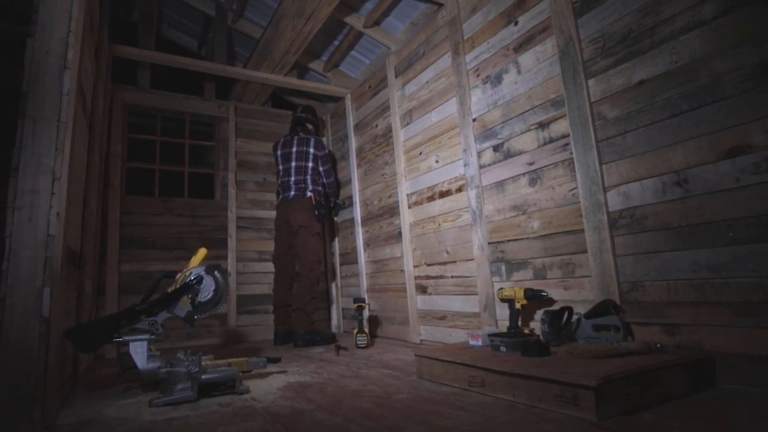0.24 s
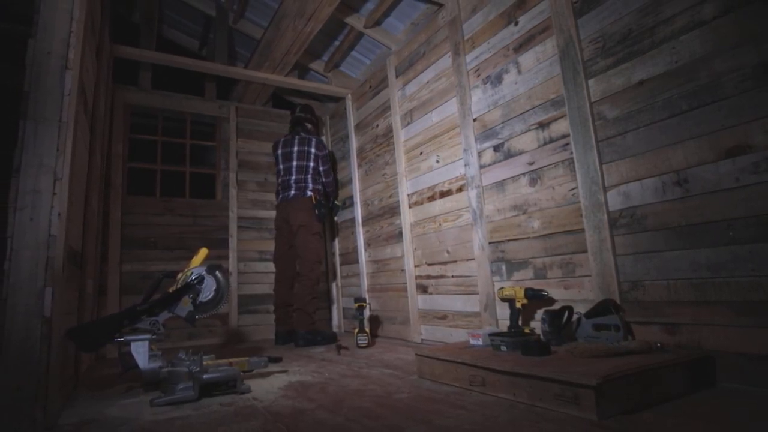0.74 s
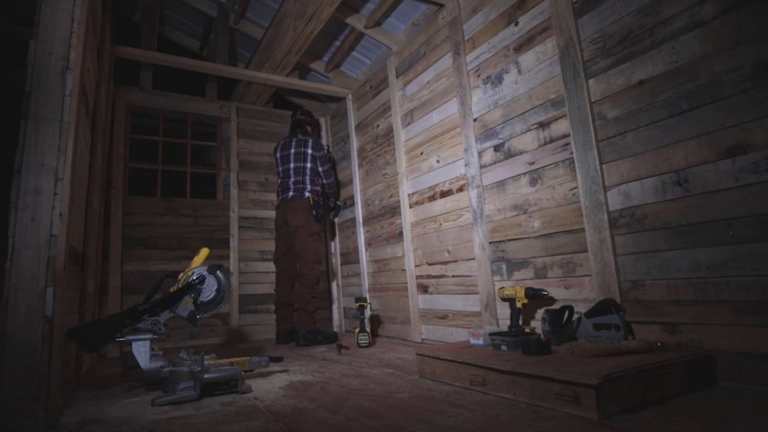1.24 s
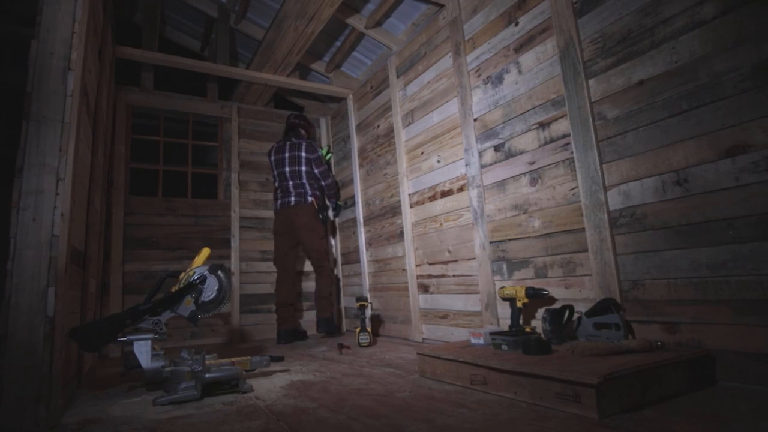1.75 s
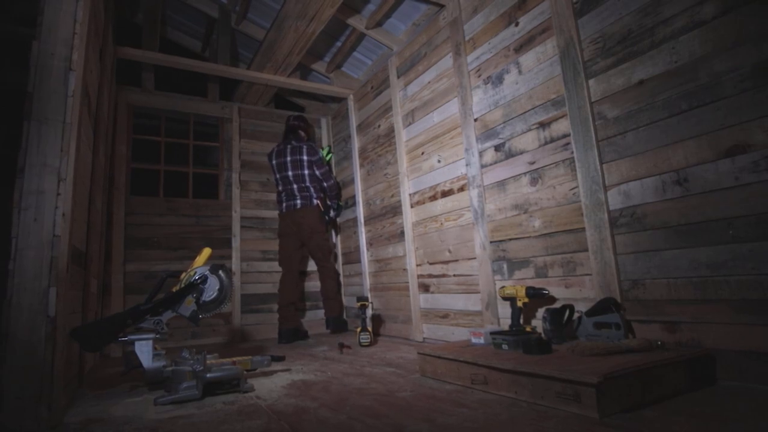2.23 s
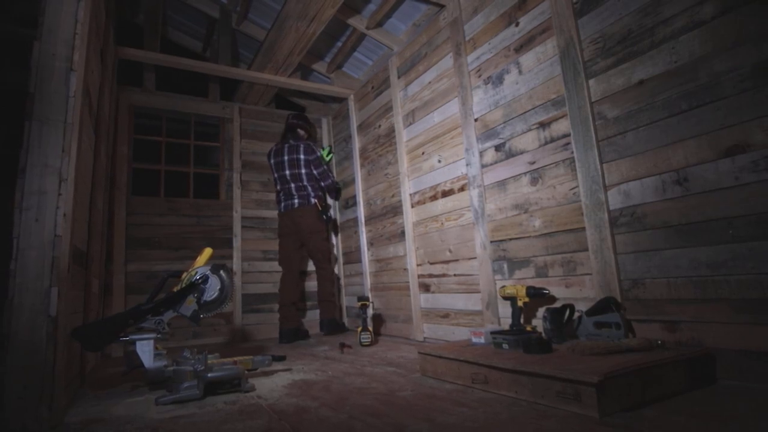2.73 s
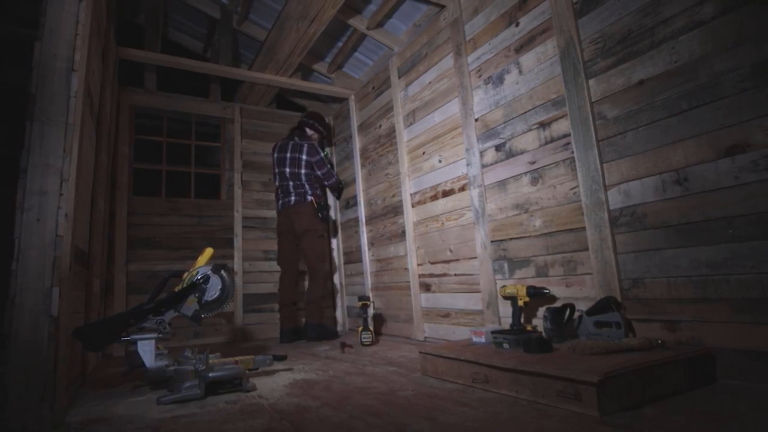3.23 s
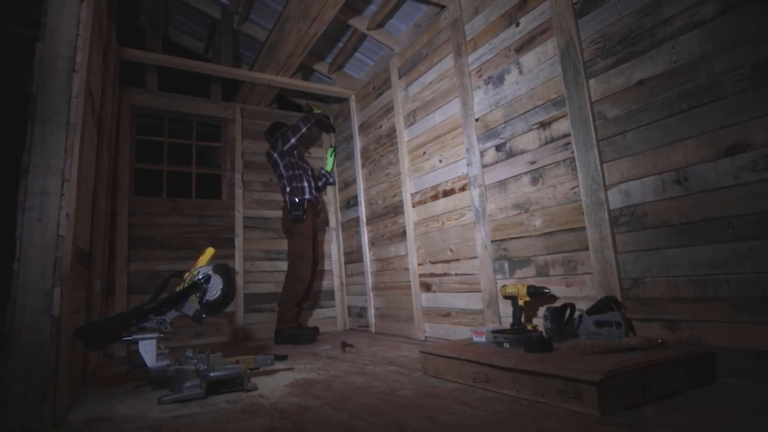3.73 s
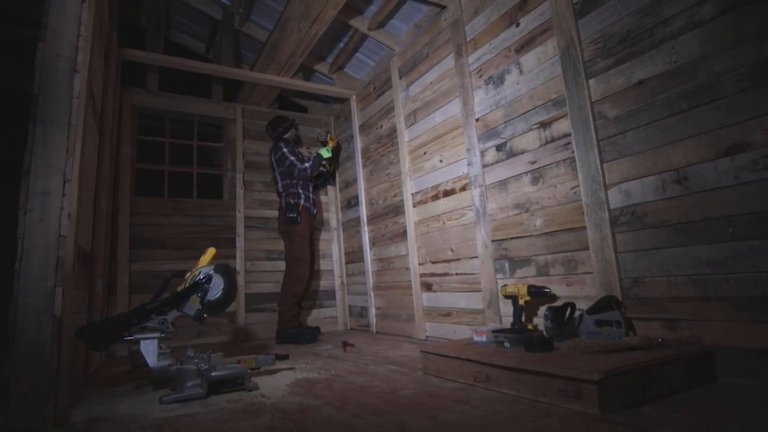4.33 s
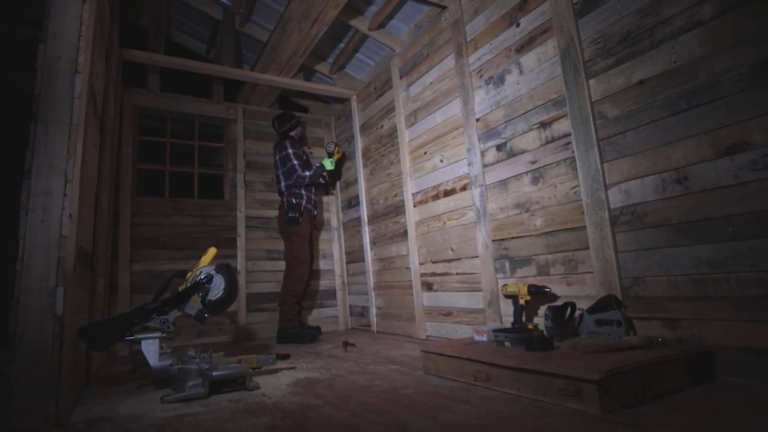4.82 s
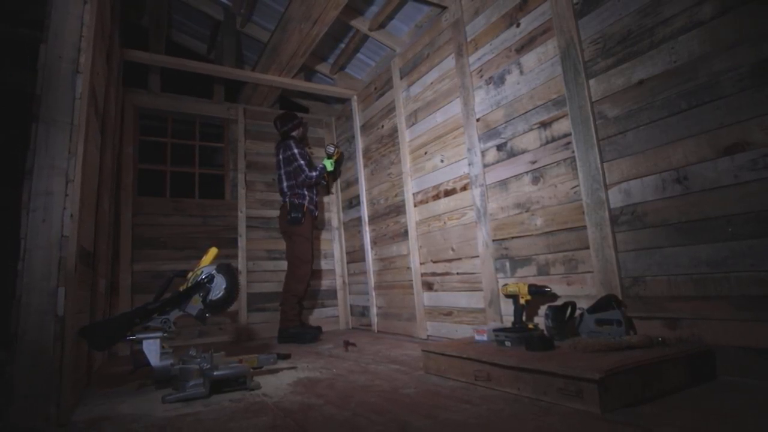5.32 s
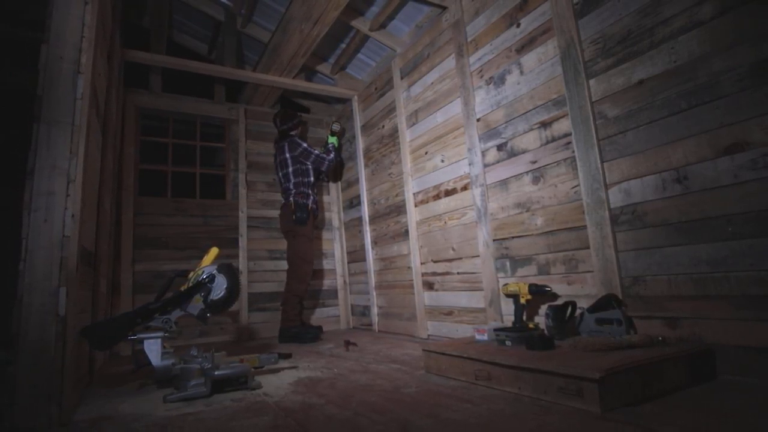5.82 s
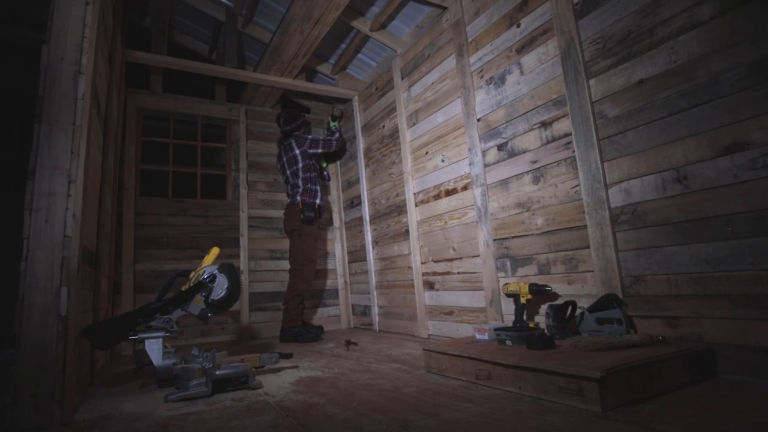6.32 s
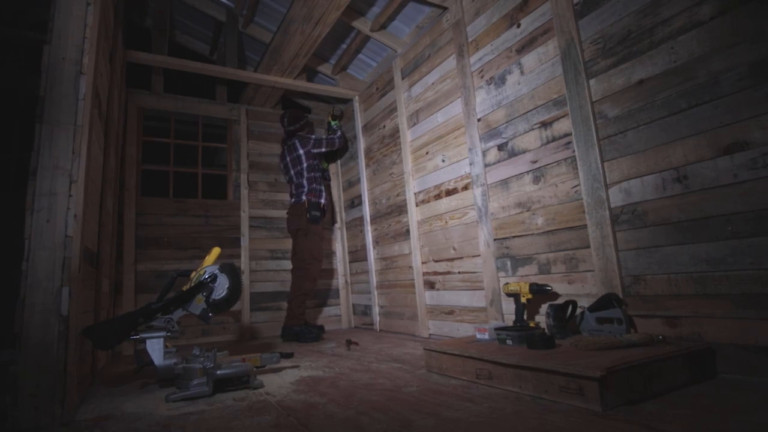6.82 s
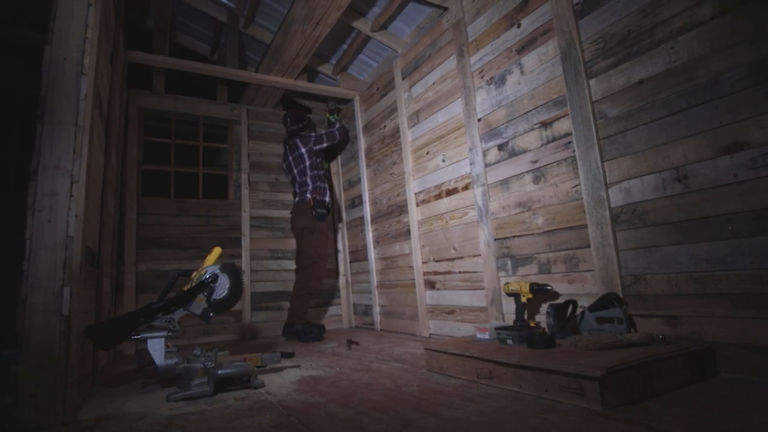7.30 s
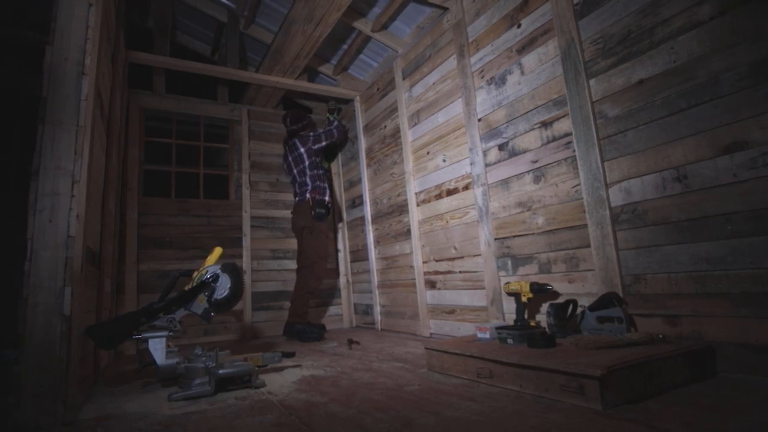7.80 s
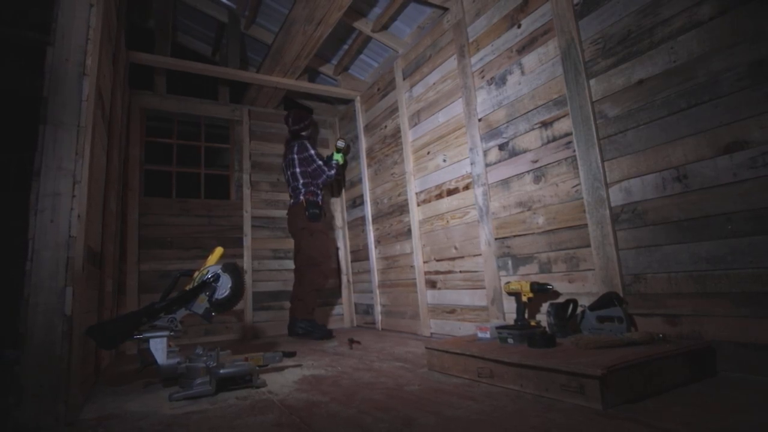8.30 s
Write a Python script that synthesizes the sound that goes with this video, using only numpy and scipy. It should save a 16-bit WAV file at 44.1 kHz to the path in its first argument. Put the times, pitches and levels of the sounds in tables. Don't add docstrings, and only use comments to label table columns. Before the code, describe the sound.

In a small wooden cabin, a board is knocked twice, then a cordless nailer whirs up and slams in two nails with loud cracks.

```python
import sys
import numpy as np
from scipy import signal
from scipy.fft import rfft, irfft, next_fast_len
from scipy.io import wavfile
from scipy.ndimage import uniform_filter1d, map_coordinates

SR = 44100
rng = np.random.default_rng(int(sys.argv[2]) if len(sys.argv) > 2 else 0)


def voltage_ratio(decibels):
    exponent = np.asarray(decibels, float) / 20
    return 10 ** exponent


def generate_wav(signal):
    frames = np.transpose(np.atleast_2d(signal))
    scaled = np.clip(frames, -1, 1) * 32767
    pcm = np.round(scaled).astype(np.int16)
    wavfile.write(sys.argv[1], SR, pcm)


N = 377055

# t/s, pole whine f/Hz
SPEED = [
    [(3.585, 30.02), (3.68, 398.2), (3.862, 1594), (3.915, 1723), (4.25, 1798), (4.4, 1749), (4.57, 1663),
     (4.76, 1500), (5.5, 950), (6.5, 60.08)],
    [(6.99, 29.92), (7.08, 390), (7.28, 1575), (7.325, 1697), (7.38, 1762), (7.81, 1768), (8.08, 1726),
     (8.3, 1659), (8.55, 1598)],
]
# t/s, level/dB, vents facing the ports/dB
RUNNING = [
    [(3.6, -84.5, -8), (3.68, -61, -9), (3.915, -55.5, -5.5), (4.2, -69, -6.5), (4.6, -68, -4),
     (5.35, -76.5, -4), (5.87, -95, 7), (6.44, -101, 12), (6.5, -101, -6)],
    [(7.0, -96.5, 2.5), (7.062, -70.5, -3), (7.15, -59.5, -10), (7.288, -57, -6), (7.442, -59, -9.5),
     (7.81, -59.5, -9.5), (8.13, -66, -11), (8.16, -66, -20.5), (8.55, -67, -25.5)],
]
# whine after stroke/dB, whine swell at the ring/dB, rattle swell/dB, rattle at full torque/dB
RUNS = [(-1, 11, 1, -51), (8, 5, 10.8, -46)]
# multiple of the whine, level/dB, extra at full torque/dB
WHINE_ORDERS = [(1, -11, -1), (2, -43.5, 28.5), (3, -47, 23.5)]
POLES = 12
SHAFT_ORDERS = [1, 2, 3, 4, 7, 8, 9, 11, 12, 17, 19, 20, 21]
SHAFT_DB = [1.5, -9, -12.5, -5.5, -12, -14.5, -14, -6, -10.5, -12.5, -18, -16, -8.5]
# f/Hz, width/Hz, lift/dB
HOUSING = (1670, 65, 25.3)
RATTLE_RINGS = [(1.04, .5), (1, 1), (.95, .4)]
WHINE_DB, TORQUE_DB, LOW_HZ, LOW_DB_PER_OCTAVE = -10, 9, 1080, 36
CROSS_HZ, CROSS_WIDTH_HZ = 1635, 45
LULL_HZ, LULL_WIDTH_HZ, LULL_DB = 1420, 110, 7.5
COAST_HZ, COAST_WIDTH_HZ = 1700, 35
COAST_SWELL_DB = [2, 3]
GLIDE_DB = np.array([12, 10.5])
GLIDE_CLEAR_HZ = 130
GRIP_S, GRIP_DB = 0.021, -22
IDLE_RATTLE_DB, RATTLE_FROM_HZ, HUM_DB = -12.5, 480, -17
# from t/s, to t/s, lift/dB, sag/dB
PRESS = (7.33, 7.91, 18.2, 18)
# from t/s, to t/s, treble level/dB
SHADE = (4.42, 4.545, -39)
FIZZ_DB, FIZZ_DB_PER_OCTAVE = -3.5, 5.5
# f/Hz, width/Hz, level/dB
GEARS1 = [(475, 71, -4.5), (1050, 120, -3.5), (1650, 180, -1.5), (2220, 99, -1), (4660, 56, -15),
          (5828, 130, -9), (6930, 240, -11), (3030, 380, -7), (10204, 160, -18.5), (11085, 220, -17.5),
          (13300, 190, -12.5), (14200, 26, -35.5)]
# f/Hz, width/Hz, level/dB
GEARS2 = [(500, 54, -6), (574, 8.5, -9.5), (1034, 25, 0), (1202, 62, -9), (1654, 17, -3.5), (1760, 30, -4),
          (2460, 48, -5), (3000, 18, -4), (3190, 110, 0), (3100, 18, 4.5), (474, 14, 0.5),
          (6280, 65, -19.5), (7650, 190, -18)]
# f/Hz, level/dB per Hz
CASE1 = [(180, -32), (300, -10.5), (1680, -9.5), (2020, -8.5), (2230, -4), (3610, -12), (5840, -23),
         (15800, -43)]
# f/Hz, level/dB per Hz
CASE2 = [(180, -35.5), (300, -5.5), (582, -13.5), (812, -10), (1020, -11), (1770, -10.5), (1950, -3.5),
         (3160, -3.5), (4330, -18), (11900, -32), (15800, -60)]
# t/s, peak level/dB, bass/dB, treble/dB, left-right/dB
SHOTS = [
    (3.9301, -7, -1, 2, 0),
    (7.827, -5, -7.5, 0.5, 0),
]
# f/Hz, level/dB per Hz
NAIL = [(24, -45.5), (40, -30), (175, -1.5), (345, -6), (465, -1.5), (731, -12.5), (987, -2.5), (1510, -1),
        (2090, -6), (3050, -4), (4320, -13), (4780, -11), (5420, -13), (14400, -21), (15900, -28)]
# f/Hz, level/dB, T60/s
WALL = [
    [(566, -11, 0.37), (1047, -3, 0.23), (1425, -12, 0.27), (1620, -1, 0.17), (1810, -9.5, 0.25),
     (2220, -11.5, 0.33), (2550, -8.5, 0.35), (2990, -8.5, 0.34), (3350, -6.5, 0.27), (3768, -8.5, 0.24),
     (4300, -18.5, 0.38), (4700, -26, 1.3), (6860, -22, 0.37), (6842, -23.5, 0.36)],
    [(468, -3, 0.18), (1007, -16, 3.3), (1512, -5.5, 0.38), (1972, -4.5, 0.23), (2453, -10, 0.36),
     (3330, -4, 0.22), (3548, -16, 0.42), (3776, -14.5, 0.26), (4300, -19.5, 0.31), (4780, -20, 0.51),
     (5600, -25, 0.67), (6000, -23, 0.53), (6594, -18.5, 0.26)] + [(880, -5.5, .3)],
]
# t/s, peak level/dB, thud/dB, click/dB, fizz/dB
BLADE = [
    (3.915, -45.5, -9, -7, -8),
    (3.9942, -25, -9.5, -7, -10.5),
    (4.097, -49, -9, -1.5, -4),
    (4.115, -50, -6, -4, -7),
    (7.8165, -40, -14.5, -0.5, -5.5),
    (7.8869, -21.5, -13, -10, -11),
    (8.0344, -49, -13, -0.5, -8),
    (8.0484, -42.5, -18.5, -6.5, -8.5),
]
# t/s, peak level/dB, bass/dB, treble/dB, left-right/dB
KNOCKS = [
    (.166, -33, -10, -10.5, .1),
    (1.991, -19.5, 2, 0, -0.57),
    (2.35, -18.5, -6.5, -1.5, -.3),
]
# f/Hz, level/dB per Hz
BOARD = [(24, -46), (40, -17), (237, -1.5), (477, 0), (613, -12.5), (731, -8), (1120, -5), (1370, 0),
         (1550, -7.5), (1760, -3.5), (2560, -15), (3540, -21.5), (5990, -37.5), (14400, -71),
         (15900, -65.5)]
# f/Hz, level/dB, T60/s
PLANK = [
    [(137, -3, 0.11), (315, -25, 3.0), (861, -0.5, 0.14), (1070, -21, 0.35), (1174, -23, 0.32),
     (1340, -2, 0.44), (1470, -26, 5.0), (1653, -7, 0.19), (1850, -24, 0.82), (2300, -22, 0.34),
     (2315, -18, 0.19)],
    [(150, -8, 0.63), (478, 4.5, 0.43), (519, -5, 0.35), (852, -15, 0.39), (1100, -13, 0.3),
     (1190, -7.5, 0.26), (1237, -10, 0.35), (1302, -6, 0.31), (1440, -11.5, 0.36), (1735, -9, 0.17),
     (1836, -19.5, 0.5), (1980, -14.5, 0.22), (3670, -15.5, 0.13), (4040, -29.5, 0.21)],
    [(145, -4.5, 0.24), (403, -3.5, 0.35), (542, -6.5, 0.34), (972, -8, 0.49), (1040, -10.5, 0.42),
     (1164, -10.5, 0.34), (1467, 0, 0.13), (1580, -10, 0.28), (1710, -6.5, 0.34), (1884, -8.5, 0.19),
     (2065, -10, 0.23), (2369, -8.5, 0.17), (3160, -12.5, 0.2), (3553, -15, 0.2)],
]
# t/s, peak level/dB, thud/dB, click/dB, fizz/dB
TICKS = [(0.0044, -58.5, -30, -15.5, -35), (0.2002, -44.5, 3, -40, -47), (0.4215, -39.5, -5, -33, -17),
         (0.4874, -53, -2, -10, -10), (1.0997, -55.5, 12, -12.5, -19), (1.6293, -67, -2.5, -11.5, -21),
         (3.247, -63.5, 16, -9, -19), (3.3494, -75, 20, -16, -21), (3.3996, -60.5, -16, -20, -27),
         (3.5153, -60, .5, -8, -17), (3.5468, -54, -2.5, -19.5, -26.5), (5.4007, -61, 2, -3, -12.5),
         (5.9766, -62.5, 12.5, -20, -25), (6.5244, -77.5, 8, -1, -25), (6.8039, -40.5, -8.5, -8.5, -12.5),
         (6.9722, -51, -10, -25.5, -28.5), (8.5287, -56, -17.5, 0, -17)]
# t/s, peak level/dB, thud/dB, click/dB, fizz/dB
SCUFFS = [(0.7194, -58.5, -23, -20.5, -28), (1.0824, -56.5, -8, -28, -22.5), (3.0794, -67.5, -6, -9, -17),
          (3.1494, -67.5, -3, -11, -19), (8.4698, -47, -15, -19.5, -23)]
# t/s, peak level/dB, thud/dB, click/dB, fizz/dB
RUBS = [
    [(.24, -63, 2.5, -4.5, -7)],
    [(2.695, -55.5, -19, -19.5, -28.5)],
    [(.44, -58.5, 4, -7, -10.5)],
]
# t/s, peak level/dB, f/Hz, width/Hz
PINGS = [(0.16, -59.5, 4640, 700), (.2, -52, 1300, 500), (0.163, -49, 2500, 900), (0.424, -52, 1090, 400),
         (.422, -61, 7600, 1500), (.478, -60, 6340, 700), (1.63, -68.5, 1470, 297), (3.697, -52, 6300, 400),
         (3.994, -28.5, 4950, 400), (3.994, -29.5, 5600, 300), (5.401, -60, 3100, 700),
         (5.401, -64, 4100, 500), (6.526, -77, 2500, 900), (6.803, -41.5, 1330, 250),
         (6.814, -41, 500, 150), (6.975, -60, 1210, 200), (7.887, -28.5, 4850, 500),
         (8.046, -47, 4350, 400), (8.046, -42, 1100, 250), (8.045, -53, 3100, 300), (8.526, -56, 4800, 400)]
# t/s, peak level/dB, f/Hz
THUDS = [(0.2, -43.5, 168.4), (0.299, -46, 139), (0.429, -52, 146), (1.1, -50, 145), (1.199, -52, 125.7),
         (3.247, -45.5, 135.4), (3.349, -58.5, 137.4), (3.546, -53, 167.9), (5.977, -54.5, 190),
         (6.817, -53.5, 141.8), (8.137, -57, 109)]
THUD_T60_S = 0.46
# f/Hz, T60/s
CABIN = [(60, 1.2), (160, 0.27), (420, 0.33), (1100, 0.33), (2910, 0.25), (7680, 0.21)]
# f/Hz, correlation
ALIKE = [(25, .92), (60, .992), (150, .996), (300, .97), (500, .84), (800, .42), (1400, .1), (3000, -.17),
         (7000, .03), (15000, -.15)]
# f/Hz, level/dB per Hz
HUSH = [(12, -61), (20, -35), (104, -5), (163, -11), (240, -7.5), (376, -21), (572, -24), (622, -24.5),
        (735, -33), (920, -27), (1060, -29.5), (1480, -32), (2130, -36.5), (10800, -50), (15900, -56)]
# f/Hz, width/Hz, level/dB
DRONE = [(140, 24, -2), (187, 9, 3), (160, 90, -8), (206, 7, 3), (246, 9, 5), (262, 8, 2), (290, 110, -10)]
# t/s, level/dB, low over high drone/dB, broad hum/dB
MURMUR = [(0, -67, 4.5, -12), (.8, -73.5, -1.5, -12), (1.64, -73.5, -3.5, -13.5), (3.1, -73, -5.5, -12.5),
          (3.6, -69, 7, -11.5), (4.3, -74.5, 13.5, -4.5), (5, -73, 12, -2), (5.8, -72, 8.5, -5.5),
          (6.7, -75.5, 14, -1.5), (7.4, -70.5, 10, -12), (8.55, -76.5, 3.5, -6)]
LAYERS_DB = [-6.5, 0.64, 2, -2.5, 0]
SWAY_DB = [2.6, 2.4, 1.2, .8, 1.5]
# rumble level/dB, low drone level/dB
BOOM_DB = [
    [-39, -40.5],
    [-48.5, -41],
]
BOOM_T60_S = [0.7, 0.77]


def unit(x):
    return x / np.sqrt(np.mean(x ** 2) + 1e-20)


def along(points, f_hz):
    f, v = np.transpose(points)
    return np.interp(np.log(f_hz + 1), np.log(f + 1), v)


def curves(rows):
    t_s, *cols = np.transpose(rows)
    return [np.interp(np.arange(N) / SR, t_s, c) for c in cols]


def between(t0_s, t1_s):
    t = np.arange(N) / SR
    gate = uniform_filter1d(1. * ((t > t0_s) & (t < t1_s)), SR // 40)
    return gate * (t - t0_s) / (t1_s - t0_s), gate


def wobble(rate_hz):
    knots = rng.standard_normal(int(N * rate_hz / SR) + 4)
    return map_coordinates(knots, [np.arange(N) * rate_hz / SR])


def filtered(x, response):
    n = x.shape[-1]
    m = next_fast_len(n + 8192)
    return irfft(rfft(x, m) * response(np.fft.rfftfreq(m, 1 / SR)), m)[..., :n]


def humps(peaks, f_hz):
    return np.sqrt(sum(voltage_ratio(2 * db) / (1 + (2 * (f_hz - c) / w) ** 2) for c, w, db in peaks))


def left_right(pan_db):
    return voltage_ratio([[pan_db / 2], [-pan_db / 2]])


def pair(n):
    def mid_side(f_hz):
        turn = np.arccos(np.clip(along(ALIKE, f_hz), -1, 1)) / 2
        return np.array([np.cos(turn), np.sin(turn)])

    mid, side = filtered(rng.standard_normal((2, n)), mid_side)
    return np.array([mid + side, mid - side])


def add(out, t_s, sound):
    i = max(round(t_s * SR), 0)
    out[:, i:i + sound.shape[1]] += sound[:, :N - i]


def second_run():
    return np.arange(N) / SR > SPEED[1][0][0] - .1


def wheel():
    rows = []
    for run in RUNNING:
        rows += [(run[0][0] - .03, -120, 0)] + list(run) + [(run[-1][0] + .3, -120, 0)]
    pole_hz, = curves(list(SPEED[0]) + list(SPEED[1]))
    return [uniform_filter1d(pole_hz, SR // 40, mode="nearest")] + curves(rows)


def motor_levels(pole_hz, level_db, torque):
    t = np.arange(N) / SR
    run = 1 * second_run()
    coast_db, swell_db, shake_db, rattle_db = np.array(RUNS)[run].T
    near = lambda f_hz, width_hz: np.exp(-((pole_hz - f_hz) / width_hz) ** 2)
    cross = near(CROSS_HZ, CROSS_WIDTH_HZ)
    stroke_s = np.array(SHOTS)[run, 0]
    struck = t > stroke_s
    whine_db = level_db + WHINE_DB + TORQUE_DB * torque + coast_db * struck + swell_db * cross
    whine_db = whine_db + LOW_DB_PER_OCTAVE * np.log2(np.minimum(pole_hz / LOW_HZ, 1))
    whine_db = whine_db + np.array(COAST_SWELL_DB)[run] * struck * near(COAST_HZ, COAST_WIDTH_HZ)
    whine_db = whine_db + GRIP_DB * (abs(t - stroke_s) < GRIP_S)
    glide_db = np.array(GLIDE_DB)[run] * torque * (1 - near(CROSS_HZ, GLIDE_CLEAR_HZ))
    strain = voltage_ratio(rattle_db + shake_db * cross - LULL_DB * near(LULL_HZ, LULL_WIDTH_HZ))
    rattle = strain * torque ** 2 * np.minimum(pole_hz / RATTLE_FROM_HZ, 1) ** 2
    rattle = rattle + voltage_ratio(level_db + IDLE_RATTLE_DB)
    part, gate = between(*PRESS[:2])
    hum_db = level_db + HUM_DB + PRESS[2] * gate - PRESS[3] * abs(part) ** 2.3
    return whine_db, glide_db, rattle, hum_db


def housing_ring(f_hz):
    f0_hz, width_hz, _ = HOUSING
    return 1j * f_hz * width_hz / (f0_hz ** 2 - f_hz * f_hz + 1j * f_hz * width_hz)


def whine():
    pole_hz, level_db, _ = wheel()
    torque = np.clip(uniform_filter1d(np.gradient(pole_hz) * SR, SR // 20) / 2500, 0, 1)
    whine_db, glide_db, shaking, hum_db = motor_levels(pole_hz, level_db, torque)
    jitter = 1 + .002 * wobble(30) + .016 * torque * wobble(150)
    turn = 2 * np.pi * np.cumsum(pole_hz * jitter) / SR
    poles = 0
    for k, db, extra_db in WHINE_ORDERS:
        order_db = db + extra_db * torque + glide_db * (round(k) == 1)
        order_db = order_db + (1.16 + 1.3 * torque) * wobble(37)
        poles = poles + voltage_ratio(order_db) * np.sin(round(k) * turn)
    body = lambda f: 1 + voltage_ratio(HOUSING[2]) * housing_ring(f) + voltage_ratio(12.0) * housing_ring(f / 3) ** 0.6
    poles = filtered(voltage_ratio(whine_db) * poles, body)
    orders = zip(SHAFT_ORDERS, SHAFT_DB)
    shaft = sum(voltage_ratio(db + 3.2 * wobble(13)) * np.sin(k * turn / POLES) for k, db in orders)
    shaft = voltage_ratio(hum_db + 3.5) * shaft
    room = cabin(early_db=3.0)
    room = room / np.linalg.norm(room[0])
    echo = signal.fftconvolve((poles + 0.17 * shaft)[None], room, axes=1)[:, :N]
    shaken = voltage_ratio(1.6 * wobble(64) + 2.0 * np.cos(turn / POLES)) * pair(N)
    parts = lambda f: sum(share * housing_ring(f / ratio) for ratio, share in RATTLE_RINGS) ** 2
    rattle = filtered(shaken, parts)
    return 0.66 * poles + shaft + voltage_ratio(-3.5) * echo + shaking * unit(rattle)


def bearings(gears, case, peak_db, pan_db):
    pole_hz, body_db, facing_db = wheel()
    hiss_db = body_db + facing_db + SHADE[2] * between(*SHADE[:2])[0] ** 2
    fizz_db = hiss_db + FIZZ_DB + FIZZ_DB_PER_OCTAVE * np.log2(pole_hz / HOUSING[0])
    z = signal.stft(pair(N), nperseg=1024)[2]
    patches = uniform_filter1d(uniform_filter1d(rng.standard_normal(z.shape[1:]), 7, 0), 9, 1)
    noise = signal.istft(z * voltage_ratio(2.2 * unit(patches)), nperseg=1024)[1][:, :N]
    colour = lambda f: np.hypot(.8 * voltage_ratio(along(case, f)), voltage_ratio(peak_db) * humps(gears, f))
    noise = filtered(noise, colour)
    out = 0
    # level/dB, from f/Hz, to f/Hz, trim/dB
    for db, lo, hi, trim_db in [(body_db, 330, 4200, 6), (hiss_db, 4300, 7000, 3.0),
                                (fizz_db, 8663, 25000, -0.5)]:
        band = unit(filtered(noise, lambda f: 1 / (1 + (lo / (f + 1)) ** 12 + (f / hi) ** 12)))
        out = out + voltage_ratio(db + trim_db) * band
    return left_right(pan_db) * out


def running():
    first = bearings(GEARS1, CASE1, peak_db=2, pan_db=-0.46)
    second = bearings(GEARS2, CASE2, peak_db=2.5, pan_db=-0.5)
    return np.where(second_run(), second, first)


def cabin(early_db, hold_s=0., size=SR):
    f_hz, t, z = signal.stft(pair(size), SR, nperseg=512)
    t = np.maximum(t - hold_s, 0)
    late = voltage_ratio(-60 * t / along(CABIN, f_hz)[:, None])
    early = voltage_ratio(early_db - 60 * t / 0.074)
    return signal.istft(z * late * (1 + early), SR, nperseg=512)[1][:, :size] / (1 + voltage_ratio(early_db))


def minimum_phase(colour_db, taps=4096):
    cep = irfft(np.log(voltage_ratio(colour_db(np.fft.rfftfreq(taps, 1 / SR))) + 1e-9))
    cep = cep * np.r_[1, 2 * np.ones(taps // 2 - 1), np.zeros(taps // 2)]
    return irfft(np.exp(rfft(cep)))


def hit(colour_db, rise_s, contact_s, early_db, modes=(), ring_db=0, size=SR, sudden=.85):
    t = np.arange(size) / SR
    swell = 1 - np.exp(-(1.6 * t / max(rise_s, 1e-3)) ** sudden)
    noise = swell * cabin(early_db, contact_s, size=size)
    sound = signal.fftconvolve(minimum_phase(colour_db)[None], noise, axes=1)[:, :size]
    for f_hz, db, t60_s in modes:
        spread = np.arccos(along(ALIKE, f_hz)) * np.array([[.5], [-.5]])
        drift = np.cumsum(rng.standard_normal(SR)) * np.sqrt(f_hz * .09 / SR)
        decay = voltage_ratio(ring_db + db - 60 * t / min(t60_s, .26))
        phase = 2 * np.pi * (f_hz * t + rng.random()) + drift + spread
        sound = sound + swell * decay * np.sin(phase)
    return sound


def blows(rows, spectrum, woods, rise_s, contact_s, noise_db, ring_db, early_db, sudden):
    out = np.zeros((2, N))
    for (t_s, db, bass_db, treble_db, pan_db), modes in zip(rows, woods):
        tilt = [(35, bass_db - 26.5), (100, bass_db + 5.5), (250, bass_db), (1500, 0.0032),
                (3300, 2.0 + treble_db / 2), (8000, treble_db), (15000, treble_db - 0.5)]
        colour = lambda f: db + noise_db + along(spectrum, f) + along(tilt, f)
        sound = hit(colour, rise_s, contact_s, early_db, modes, db + ring_db, sudden=sudden)
        add(out, t_s - .6 * rise_s, sound * left_right(pan_db))
    return out


def nails():
    return blows(SHOTS, NAIL, WALL, 0.011, 0.014, noise_db=7, ring_db=-9.5, early_db=-1.0, sudden=2.2)


def knocks():
    return blows(KNOCKS, BOARD, PLANK, .0035, 0.0058, noise_db=13.5, ring_db=-9, early_db=-7, sudden=1.9)


def contacts(rows, contact_s, lead, rise, noise_db):
    out = np.zeros((2, N))
    for t_s, db, thud_db, click_db, fizz_db in rows:
        shape = [(50, thud_db - 14.5), (170, thud_db + 8.0), (550, thud_db / 2 - 5.0),
                 (1500, 0.0015), (4600, click_db + 1.5), (11000, fizz_db - 5.0)]
        colour = lambda f: db + noise_db + along(shape, f)
        sound = hit(colour, rise * contact_s, contact_s, early_db=-2.5, size=SR // 2)
        add(out, t_s - lead * contact_s, sound)
    return out


def blade():
    return contacts(BLADE, .008, lead=.3, rise=0.51, noise_db=8.5)


def handling():
    out = contacts(TICKS, 0.0091, lead=0.69, rise=1.0, noise_db=9.5)
    out += contacts(SCUFFS, 0.093, lead=0.69, rise=1.0, noise_db=5.5)
    out += contacts(RUBS[0], 0.2, lead=0, rise=0.94, noise_db=6.0)
    out += contacts(RUBS[1], 0.123, lead=0, rise=0.16, noise_db=5.5)
    out += contacts(RUBS[2], 0.041, lead=0, rise=0.32, noise_db=5.5)
    return out


def pings():
    out = np.zeros((2, N))
    for t_s, db, f_hz, width_hz in PINGS:
        colour = lambda f: db + 16.0 - 20 * np.log10(1 + (2 * (f - f_hz) / width_hz) ** 2)
        add(out, t_s, hit(colour, .002, 0.0034, early_db=8, size=SR // 2))
    return out


def thuds():
    out, t = np.zeros((2, N)), np.arange(SR) / SR
    for t_s, db, f_hz in THUDS:
        envelope = voltage_ratio(db - 1.5 - 60 * t / THUD_T60_S) * (1 - np.exp(-t / 0.002))
        add(out, t_s - .004, (envelope * np.sin(2 * np.pi * f_hz * t))[None])
    return out


def hush():
    air = lambda f: voltage_ratio(along(HUSH, f))
    drone = lambda f: humps(DRONE, f)
    band = lambda lo, hi, gain: unit(filtered(pair(N), lambda f: gain(f) * (f >= lo) * (f < hi)))
    layers = [band(0, 100, air), band(100, 198, drone), band(198, 400, drone),
              band(400, 16000, air), band(215, 400, air)]
    level_db, low_db, broad_db = curves(MURMUR)
    gains = [voltage_ratio(level_db + db + side * low_db / 2) for db, side in zip(LAYERS_DB, [0, 1, -1, 0, 0])]
    gains[4] = gains[4] * voltage_ratio(broad_db)
    t = np.arange(N) / SR
    for rows, boom_db in zip([KNOCKS, SHOTS], BOOM_DB):
        for t_s, db, *_ in rows:
            after = np.maximum(t - t_s, 0)
            for k in range(2):
                decay = voltage_ratio(db + boom_db[k] - 60 * after / BOOM_T60_S[k])
                gains[k] = gains[k] + decay * (1 - np.exp(-after / .03))
    return sum(g * voltage_ratio(sway_db * wobble(4.4)) * x for g, x, sway_db in zip(gains, layers, SWAY_DB))


def scene():
    small = blade() + handling() + pings() + thuds()
    return (whine() + small) * left_right(-0.8) + running() + nails() + knocks() + hush()


def band_limit(x):
    return signal.sosfilt(signal.butter(12, 16120, fs=SR, output="sos"), x)


def record(dry):
    shelf = lambda f: voltage_ratio(np.array([[-.7], [.7]]) * f ** 2 / (f ** 2 + 700 ** 2))
    clipped = np.clip(filtered(dry, shelf), -1, 1)
    mix = filtered(clipped, lambda f: f < 16100)
    return band_limit(mix)


dry = scene()
out = record(dry)
generate_wav(out)
```